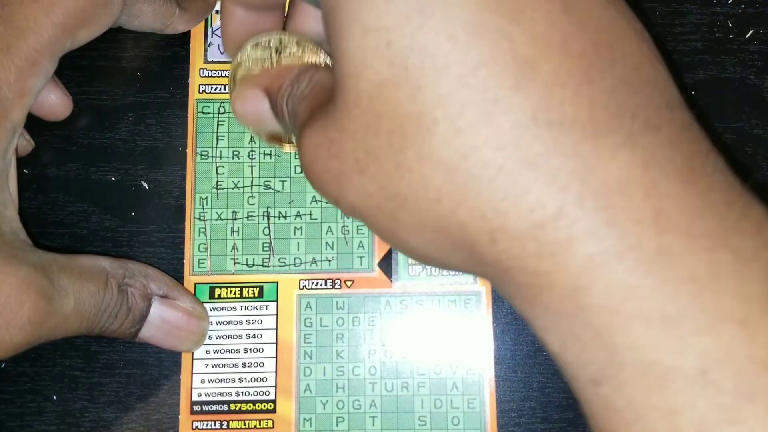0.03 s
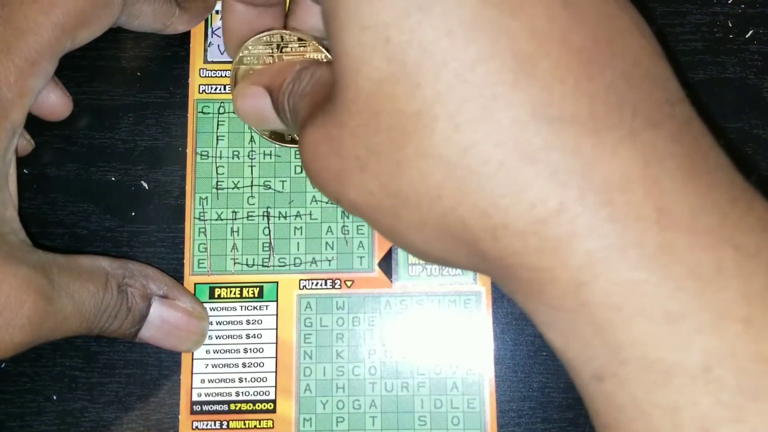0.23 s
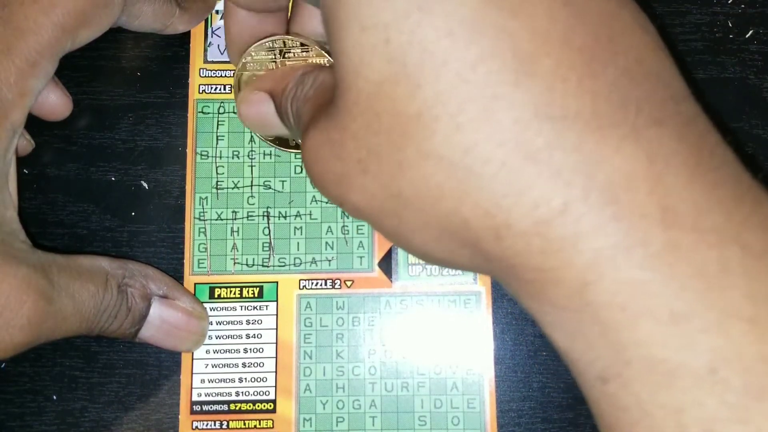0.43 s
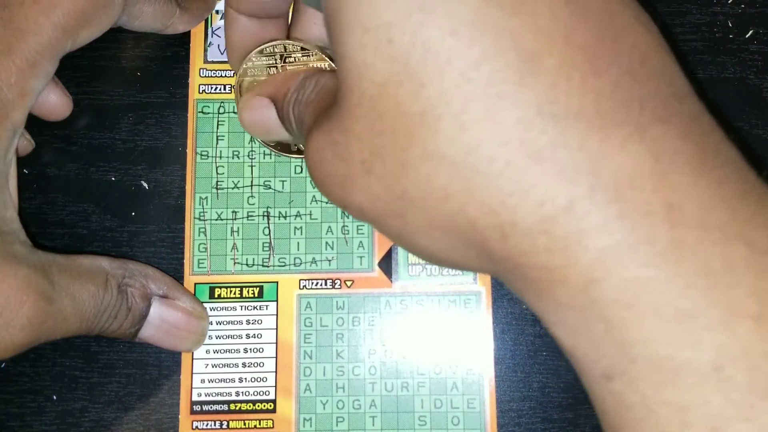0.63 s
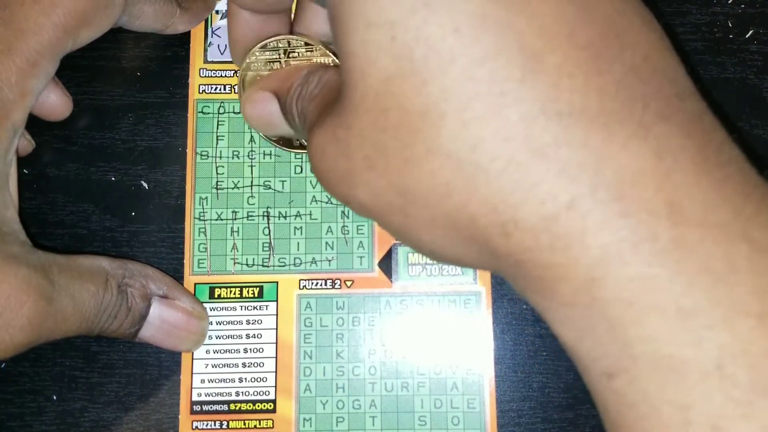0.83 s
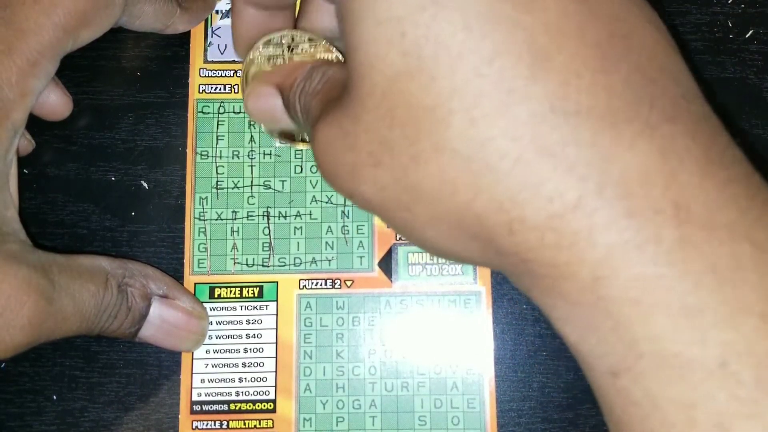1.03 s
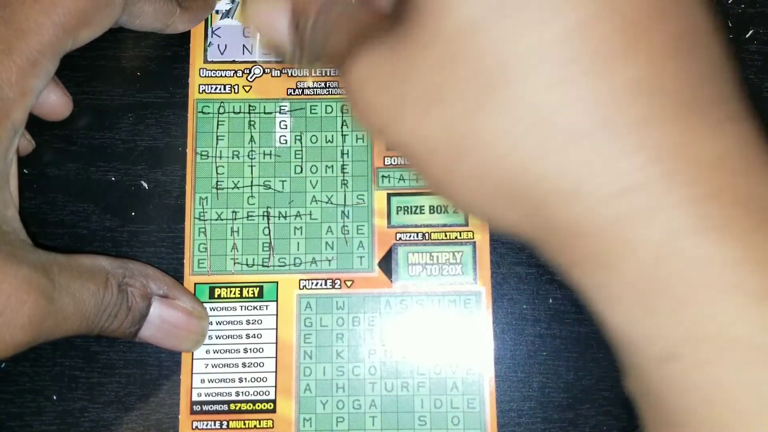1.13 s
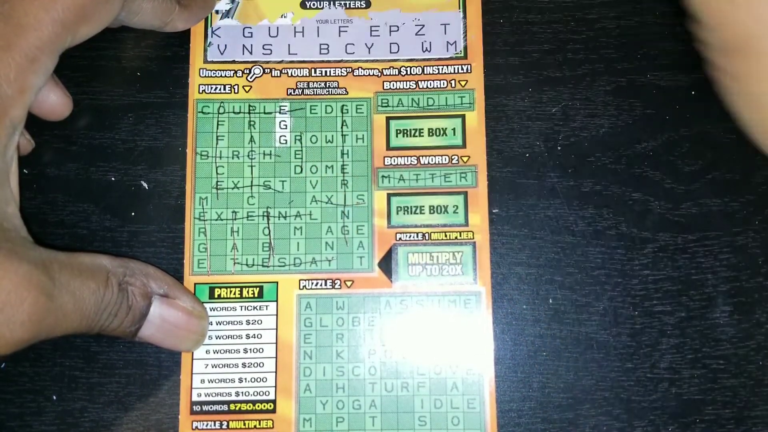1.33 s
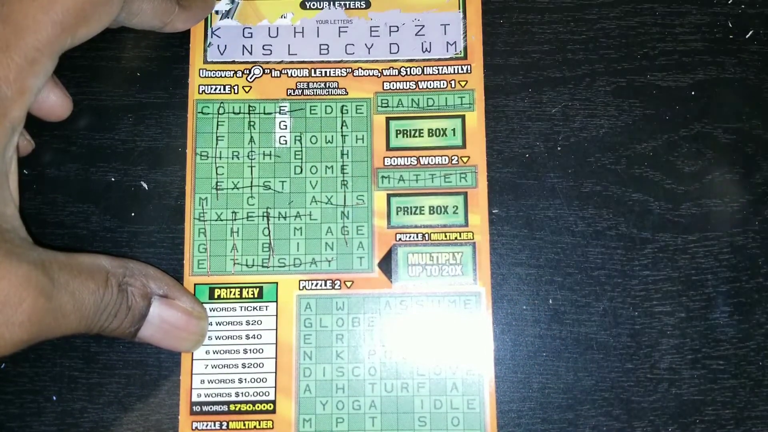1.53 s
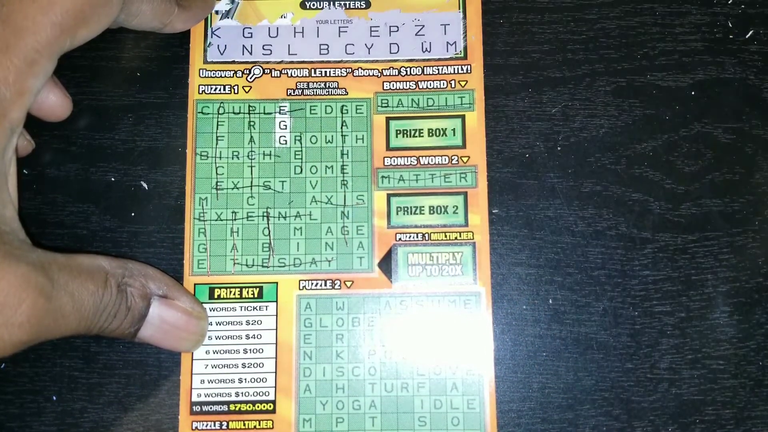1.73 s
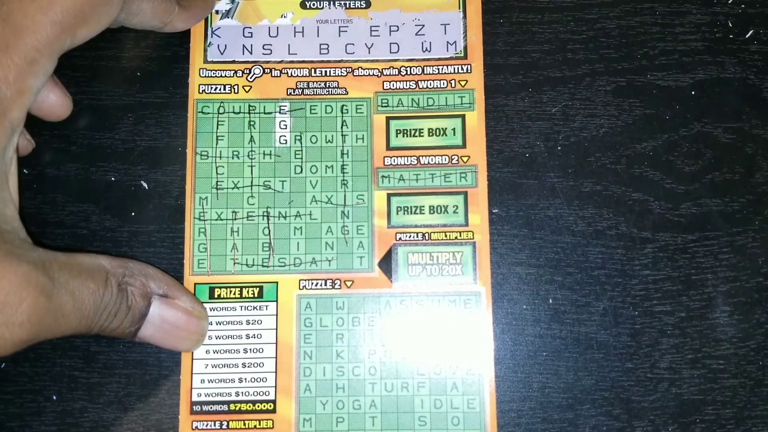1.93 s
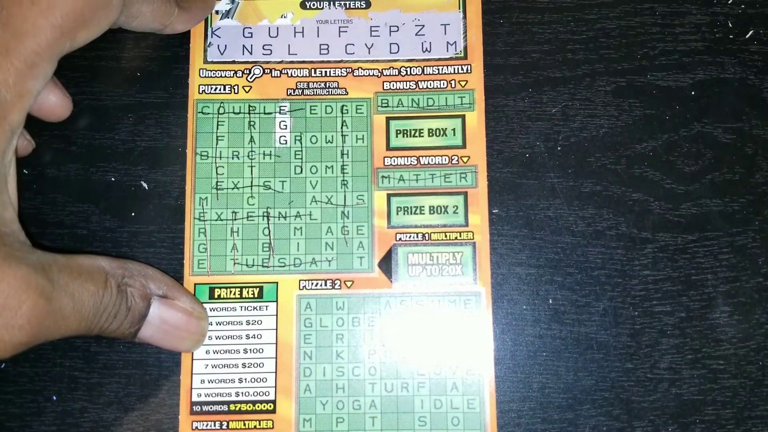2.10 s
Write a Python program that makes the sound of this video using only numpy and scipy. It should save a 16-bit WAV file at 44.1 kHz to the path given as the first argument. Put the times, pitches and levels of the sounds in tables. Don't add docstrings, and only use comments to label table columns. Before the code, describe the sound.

A coin scratches a paper ticket on a hollow wooden table in about twelve quick, gritty strokes, pauses, then drops in a sharp triple knock and slides briefly; quiet humming room, close stereo microphones.

```python
import sys
import numpy as np
from scipy import signal
from scipy.fft import rfft, irfft
from scipy.io import wavfile

SR = 44100
rng = np.random.default_rng(int(sys.argv[2]) if len(sys.argv) > 2 else 0)


def store_pcm(level_fs):
    pcm = np.round(np.clip(level_fs, -1, 1) * 32767).astype(np.int16)
    wavfile.write(sys.argv[1], SR, np.atleast_2d(pcm).T)


def gain_from_decibels(decibels):
    exponent = np.asarray(decibels, float) / 20
    return 10 ** exponent


N = 95388
LANDING_S, BOARD_HZ = 1.7019, 1023
KNOCK_CUT_HZ, RIM_CUT_HZ = 2380, 6900


def rms_one(x):
    return x / np.sqrt(np.mean(x ** 2) + 1e-20)


def in_time(rows):
    s, *columns = np.transpose(rows)
    return [np.interp(np.arange(N) / SR, s, c, left=-120) for c in columns]


def at_hz(points, hz):
    point_hz, values = np.array(points).T
    return np.interp(np.log(hz), np.log(point_hz), values)


def drift(rate_hz):
    r = np.exp(-2 * np.pi * rate_hz / SR)
    white = rng.standard_normal(N + 9000)
    return rms_one(signal.lfilter([1], [1, -2 * r, r * r], white)[9000:])


def peak(x, hz, width_hz):
    r = np.exp(-np.pi * width_hz / SR)
    top = np.array([1, 0, -1]) * (1 - r * r) / 2
    return signal.lfilter(top, [1, -2 * r * np.cos(2 * np.pi * hz / SR), r * r], x + 1e-18)


def steep_peak(x, hz, width_hz):
    return peak(peak(x, hz, width_hz), hz, width_hz)


def body(x, peaks):
    return sum((-1) ** k * gain_from_decibels(db) * steep_peak(x, hz, width_hz * 1.41)
               for k, (hz, width_hz, db) in enumerate(peaks))


def strike(times, dbs, modes, scatter_db):
    out = np.zeros(N)
    luck = rng.normal(0, 1, (len(times), len(modes)))
    at = (np.array(times) * SR).astype(int)
    for k, (hz, db, t60_s) in enumerate(modes):
        clicks = np.zeros(N)
        clicks[at] = (-1) ** k * gain_from_decibels(np.array(dbs) + db + scatter_db * luck[:, k])
        r, w = gain_from_decibels(-60 / (t60_s * SR)), 2 * np.pi * hz / SR
        out += signal.lfilter([0, np.sin(w)], [1, -2 * r * np.cos(w), r * r], clicks + 1e-18)
    return out


def soft(x, cut_hz):
    return signal.sosfilt(signal.butter(4, cut_hz, fs=SR, output="sos"), x)


def high_pass(x, cut_hz):
    return signal.sosfilt(signal.butter(2, cut_hz, "high", fs=SR, output="sos"), x)


def slips():
    slips_per_s, spread_db = 4500, 3
    sizes = gain_from_decibels(spread_db * np.minimum(rng.exponential(1, N), 5)) * rng.choice([-1, 1], N)
    return rms_one(sizes * (rng.random(N) < slips_per_s / SR))


def hump(middle_s, length_s, power):
    return np.cos(np.pi * np.clip((np.arange(N) / SR - middle_s) / length_s, -.5, .5)) ** power


def swells(rows, hz):
    t = np.arange(N) / SR
    out = np.zeros(N)
    for s, length_s, db in rows:
        detune, turn = rng.normal(0, 1, 2)
        ring = np.sin(2 * np.pi * hz * (1 + 0.0056 * detune) * (t - s) + 3 * turn)
        out += gain_from_decibels(db) * hump(s, 1.3 * length_s, 1.5) * ring
    return out


def noise(spectrum, patchy_db):
    # pitch_hz, likeness [0..1]
    likeness = [(50, 1), (300, 0.6), (800, 0.094), (2000, 0.1), (6000, 0.0099)]
    lo, hi = spectrum[0][0], spectrum[-1][0]
    edges = np.geomspace(lo, hi, int(2.5 * np.log2(hi / lo)) + 1)
    out, white = 0, rng.standard_normal((2, 2, N + 9000))
    for k, (low, high) in enumerate(zip(edges, edges[1:])):
        band = signal.butter(2, [low, high], "band", fs=SR, output="sos")
        mid, side = signal.sosfilt(band, white[k % 2])[:, 9000:]
        hz = np.sqrt(low * high)
        c = np.clip(at_hz(likeness, hz), -1, 1)
        stereo = np.sqrt(1 + c) * mid + np.sqrt(1 - c) * side * [[1], [-1]]
        out = out + gain_from_decibels(at_hz(spectrum, hz) + patchy_db * drift(18.5)) * stereo
    return rms_one(out)


def place(x, pan, lag, diffuse_db):
    hz = np.fft.rfftfreq(2 * N, 1 / SR)
    half = gain_from_decibels(at_hz(pan, hz + 1) / 2) * np.exp(-1j * np.pi * hz * lag / SR)
    direct = irfft(rfft(x, 2 * N) * [half, 1 / half])[:, :N]
    echo = rng.standard_normal((2, 4000)) * gain_from_decibels(-60 * np.arange(4000) / SR / 0.14)
    echo = high_pass(echo, 350)
    echo /= np.sqrt(np.sum(echo ** 2, axis=1, keepdims=True))
    return direct + gain_from_decibels(diffuse_db) * signal.fftconvolve(direct, echo, axes=1)[:, :N]


def room():
    # pitch_hz, level_db [dB per Hz]
    hum = [(13, -24.5), (22, -9.5), (129, -0.5), (202, -3.5), (269, -8), (339, -13), (434, -23.5),
           (700, -51), (910, -63), (1540, -120)]
    # pitch_hz, level_db [dB per Hz]
    air = [(410, -38), (700, 3.5), (1090, -7), (1550, -3), (2220, -5.5), (4600, -4.5), (5660, -1),
           (6710, -11), (15600, -4)]
    return gain_from_decibels(-64.5) * noise(hum, patchy_db=1.0) + gain_from_decibels(-75) * noise(air, patchy_db=0.5)


def scratching():
    # start_s, length_s, level_db, boom_db, grit_db
    strokes = [(-.03, 0.077, -50.5, -3, -12.5), (0.074, 0.077, -54.5, -7.5, -10.5),
               (0.188, 0.077, -60, 4, -13), (0.333, 0.049, -57.5, -14, -12.5), (0.416, 0.06, -59.5, -3, -9),
               (0.508, 0.076, -60.5, -6, -11), (0.62, 0.074, -57, 6, -10),
               (0.719, 0.064, -49.5, -12.5, -13), (0.811, 0.075, -54.5, -1, -11),
               (0.917, 0.064, -54, -11.5, -9.5), (1.0, 0.074, -54, -2.5, -13),
               (1.094, 0.049, -64, -5.5, -10.5)]
    # pitch_hz, width_hz, level_db
    board_peaks = [(813, 100, -1.5), (1020, 59, 4.5), (936, 537, -7), (1200, 18, -4), (1350, 78, -16),
                   (1584, 240, -17), (2266, 67, -17)]
    # pitch_hz, width_hz, level_db
    boom_peaks = [(313.5, 95, -2), (490, 192, -1), (594, 150, 0.5)]
    # pitch_hz, width_hz, level_db
    grit_peaks = [(3685, 280, 1.5), (4960, 660, -0.5), (6150, 920, -17), (2760, 800, -8.5),
                  (9600, 3100, -23)]
    # start_s, peak_db
    catches = [(0.024, -42.5), (0.103, -69), (0.131, -46), (0.219, -44.5), (0.349, -44.5), (0.429, -49),
               (0.447, -42.5), (0.536, -46.5), (0.561, -46.5), (0.62, -61), (0.644, -40), (0.717, -49),
               (0.732, -48), (0.758, -36.5), (0.831, -40), (0.85, -43.5), (0.937, -46), (1.005, -51.5),
               (1.018, -57)]
    catch_db, catch_delay_s, catch_length_s, catch_hz = -8, 0.006975, 0.016, 1010.3
    flutter_db = 1.5
    board, boom, grit = (rms_one(body(slips(), peaks)) * gain_from_decibels(flutter_db * drift(27))
                         for peaks in (board_peaks, boom_peaks, grit_peaks))
    out = gain_from_decibels(-79.5) * hump(0.195, 2.1, 0.46) * (board + boom + 0.1 * grit)
    for s, length_s, db, boom_db, grit_db in strokes:
        swell = gain_from_decibels(db - 2.5) * hump(s + length_s / 2, length_s * 1.4, 1.99)
        out += swell * (board + gain_from_decibels(boom_db) * boom + gain_from_decibels(grit_db) * grit)
    pushes = [(s + catch_delay_s, catch_length_s, db + catch_db) for s, db in catches]
    return out + swells(pushes, catch_hz)


def leaning_hand():
    # middle_s, length_s, level_db, pitch_hz
    leans = [(-0.015, 0.027, -58, 152), (0.222, 0.051, -58.5, 97), (0.454, 0.061, -58, 490),
             (0.638, 0.03, -50.5, 150), (0.855, 0.086, -62, 141), (1.035, .1, -63.5, 176),
             (1.326, 0.08, -64, 95), (1.338, 0.03, -83, 815), (1.388, 0.099, -68.5, 159),
             (0.765, 0.021, -57.5, 735)]
    white, out = rng.standard_normal(N), np.zeros(N)
    for s, length_s, db, hz in leans:
        push = hump(s, 1.75 * length_s, 0.74) * steep_peak(white, hz, 0.46 * hz)
        out += gain_from_decibels(db) * np.sqrt(length_s * SR / N) * rms_one(push)
    return out


def fingertip():
    # pitch_hz, level_db, t60_s
    card = [(820, 0, .04), (1700, -20, .012), (2500, -18, .012)]
    return soft(strike([1.3], [-60], card, scatter_db=1), KNOCK_CUT_HZ)


def sleeve():
    # pitch_hz, width_hz, level_db
    cloth = [(5500, 900, 12), (5000, 470, -5)]
    rustle = rms_one(body(rng.standard_normal(N), cloth))
    return gain_from_decibels(-81.5) * hump(1.605, 0.26, 1.4) * rustle


def landing():
    # delay_cycles [board ring cycles], peak_db, bright_db
    contacts = [
        (0.0, -17.5, -14),
        (3.0, -18.5, -17),
        (6.0, -19, 2.5),
        (8.0, -44, -18),
        (9.0, -23, -18),
        (11.0, -21, -33),
    ]
    # pitch_hz, level_db, t60_s
    knock_tones = [(672, -27, .05), (807, -24, .04), (1023, 0, .02), (1220, -21, .04), (1381, -24, .05),
                   (1517, -12, .035), (1724, -19, .04), (1868, -21, .04), (2048, -22, .035),
                   (2236, -25, .04), (2369, -26, .04), (2733, -13, .055), (3110, -20, .025),
                   (3590, -24, .02)]
    # pitch_hz, level_db, t60_s
    table_modes = [(153.5, -2, 0.21), (200.8, -4.5, 0.26), (409, -8.5, 0.024), (454, 2, 0.055)]
    # pitch_hz, level_db, t60_s
    clink_modes = [(4880, 0, .013), (5230, -6, .012), (3900, -20, .01), (6500, -20, .01),
                   (10000, -24, .008)]
    cycles, db, bright_db = np.transpose(contacts)
    s = LANDING_S + np.round(cycles) / BOARD_HZ
    knock = strike(s, db, knock_tones, scatter_db=2.5)
    thud = strike(s[:1], [-38], table_modes, scatter_db=1.5)
    clink = strike(s, db + bright_db - 15, clink_modes, scatter_db=1.5)
    return high_pass(soft(knock + thud, KNOCK_CUT_HZ), 90) + soft(clink, RIM_CUT_HZ)


def after_sound():
    # pitch_hz, level_db [dB per Hz]
    tail = [(110, -11), (220, -14), (450, 9.5), (1000, 0), (2100, 7), (3200, -14), (5000, -14), (7500, -33),
            (14000, -38)]
    tail_db, tail_t60_s, crack_db, crack_t60_s = -43, 0.24, -33, 0.05
    t = np.arange(N) / SR - LANDING_S
    fall = gain_from_decibels(tail_db - 60 * t / tail_t60_s) + gain_from_decibels(crack_db - 60 * t / crack_t60_s)
    return np.where(t > 0, fall, 0) * noise(tail, patchy_db=2)[0]


def sliding():
    # start_s, ring_db, upper_db, hiss_db
    drag_levels = [(1.74, -64, -55, -65.5), (1.815, -54, -74, -78.5), (1.865, -72, -82, -70),
                   (1.892, -58, -60.5, -65.5), (1.94, -58, -64, -67), (1.964, -52.5, -48, -63),
                   (2.005, -72, -71.5, -67), (2.045, -51.5, -58, -68), (2.095, -66, -68.5, -66.5),
                   (2.118, -92, -66.5, -66.5), (2.163, -103, -67, -65.5)]
    # pitch_hz, width_hz, level_db
    hiss_peaks = [(2280, 1400, 2), (3170, 220, 10), (3630, 1100, -0.5), (5470, 4800, -16.5)]
    # pitch_hz, width_hz, level_db
    rumble_peaks = [(330, 150, -1.8), (607, 490, -0.21)]
    ring_db, upper_db, hiss_db = in_time(drag_levels)
    ring, upper = (rms_one(steep_peak(slips(), hz, width_hz)) * gain_from_decibels(2.1 * drift(44))
                   for hz, width_hz in ((1026, 90), (1380, 300)))
    drag = gain_from_decibels(ring_db) * ring + gain_from_decibels(upper_db) * upper
    drag += gain_from_decibels(hiss_db) * rms_one(body(slips(), hiss_peaks))
    rumble = rms_one(body(slips(), rumble_peaks))
    return drag + gain_from_decibels(-69.5) * hump(1.917, 0.38, 0.4) * rumble


def rocking():
    # middle_s, length_s, level_db
    rocks = [(1.744, 0.013, -55), (1.773, 0.033, -47), (1.794, .014, -44.5), (1.818, .022, -48.5),
             (1.844, 0.024, -64.5), (1.871, 0.022, -58), (1.881, 0.0078, -47), (1.894, 0.015, -45),
             (1.907, 0.0076, -43), (1.917, 0.027, -68), (1.941, 0.012, -49), (1.956, 0.014, -55),
             (1.978, 0.032, -62), (1.984, 0.014, -70), (2.026, 0.02, -65), (2.038, 0.006, -56),
             (2.044, 0.02, -50.5), (2.06, 0.011, -52), (2.08, 0.023, -58)]
    return swells(rocks, BOARD_HZ)


def rim_ticks():
    # start_s, peak_db, bright_db
    ticks = [
        (1.837, -71, 2),
        (1.845, -54, -8),
        (1.8829, -43.5, -9.5),
        (1.8898, -41.5, -12),
        (1.8973, -44, -5),
        (1.961, -39.5, -16),
        (1.9658, -47, -13),
    ]
    # pitch_hz, level_db, t60_s
    rim_modes = [(1400, -14, .02), (2600, -10, .012), (3180, -4, .016), (3950, -13, .012)]
    # pitch_hz, level_db, t60_s
    top_modes = [(5050, -4, .01), (5750, 0, .012), (6700, -4, .01), (10500, 6, .003)]
    s, db, bright_db = np.transpose(ticks)
    ring = strike(s, db, rim_modes, scatter_db=4.0)
    ring += strike(s, db + bright_db, top_modes, scatter_db=4.5)
    return soft(ring, RIM_CUT_HZ)


def squeak():
    # start_s, first_db, second_db, third_db
    partials = [(1.97, -90, -85, -90), (1.99, -76, -64, -76), (2.016, -74, -62, -75), (2.05, -72, -68, -79),
                (2.075, -76, -65, -72), (2.105, -77, -63, -71), (2.12, -77, -71, -72),
                (2.14, -75, -61, -75), (2.163, -72, -56, -80)]
    start_hz, rise_hz_per_s, bend_hz_per_s2 = 1260, 1400, 4200
    t = np.arange(N) / SR - 1.98
    hz = start_hz + rise_hz_per_s * t + bend_hz_per_s2 * t * t
    phase = 2 * np.pi * np.cumsum(hz * (1 + 0.00415 * drift(86.5))) / SR
    return sum(np.sqrt(2) * gain_from_decibels(db + 1.4 * drift(69)) * np.sin((k + 1) * phase)
               for k, db in enumerate(in_time(partials)))


def scene():
    # pitch_hz, left_minus_right_db
    ticket_pan = [(60, -2), (180, 5), (550, -0.5), (1650, 3), (4970, 15.5), (15000, 7)]
    # pitch_hz, left_minus_right_db
    coin_pan = [(60, -2), (180, 3), (550, 1.5), (1100, 2.5), (2500, 9), (4970, 15.5), (15000, 4)]
    floor = room()
    ticket = scratching() + leaning_hand() + fingertip() + sleeve()
    coin = landing() + after_sound() + sliding() + rocking() + rim_ticks() + squeak()
    return (place(ticket, ticket_pan, lag=-3.5, diffuse_db=-8)
            + place(coin, coin_pan, lag=3.76, diffuse_db=-11) + floor)


def roll_off(x):
    return signal.sosfilt(signal.butter(12, 15980, fs=SR, output="sos"), x)


def record(dry):
    cut = signal.sosfilt(signal.cheby2(12, 60, 16400, fs=SR, output="sos"), dry)
    return roll_off(cut)


dry = scene()
out = record(dry)
store_pcm(out)
```